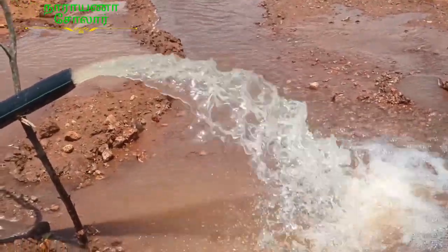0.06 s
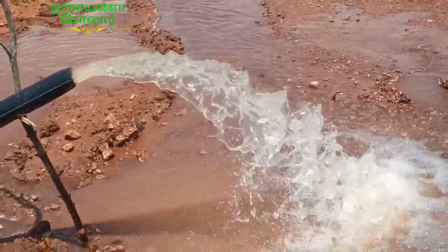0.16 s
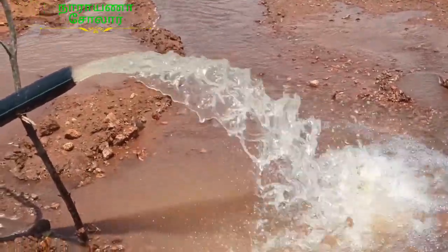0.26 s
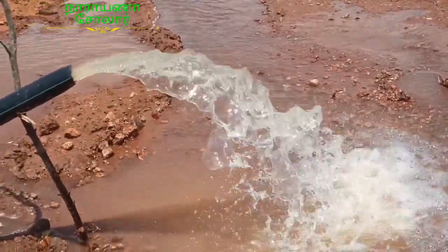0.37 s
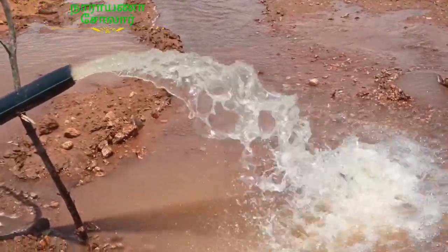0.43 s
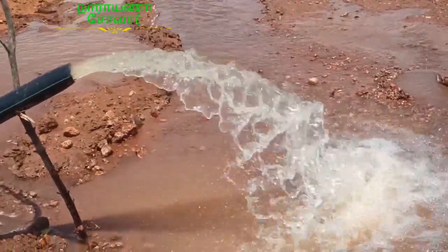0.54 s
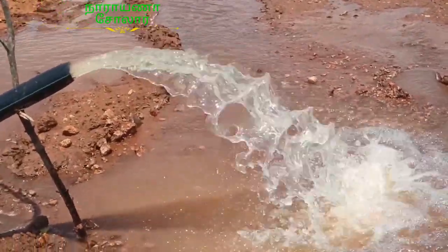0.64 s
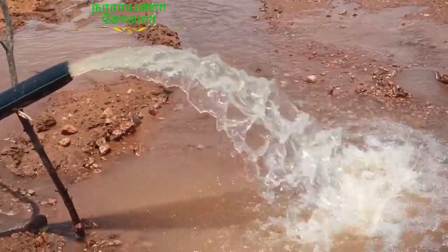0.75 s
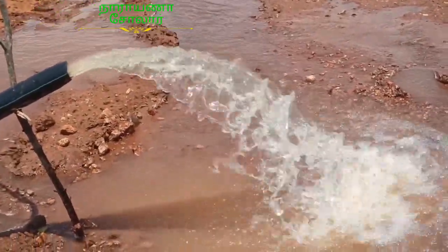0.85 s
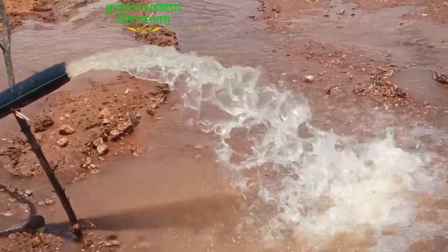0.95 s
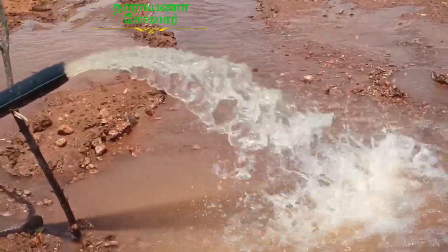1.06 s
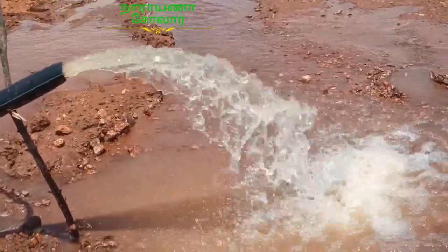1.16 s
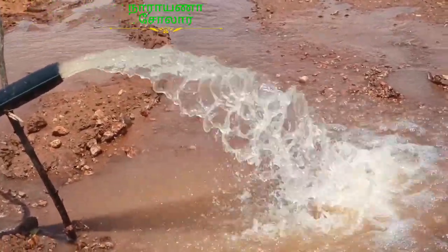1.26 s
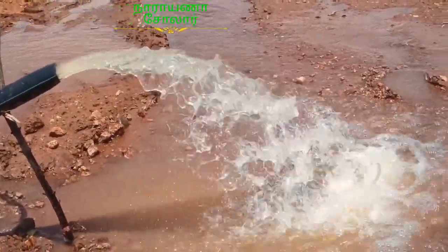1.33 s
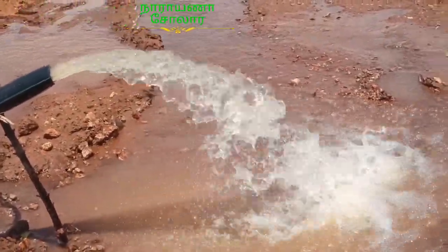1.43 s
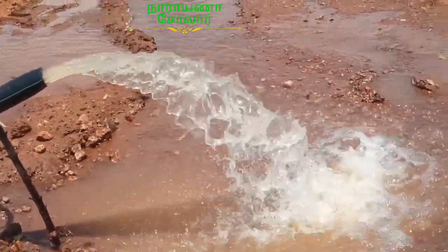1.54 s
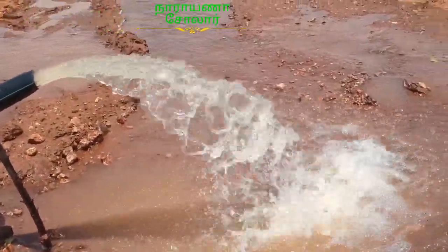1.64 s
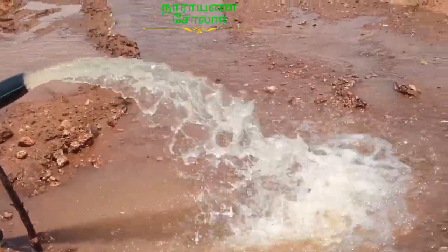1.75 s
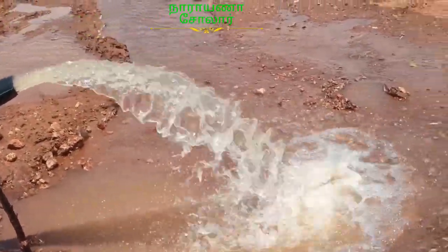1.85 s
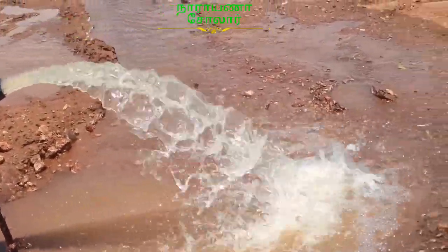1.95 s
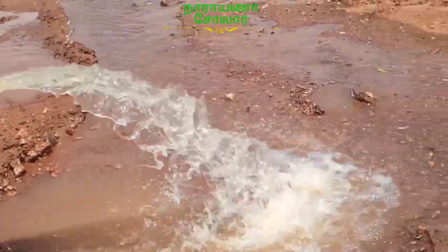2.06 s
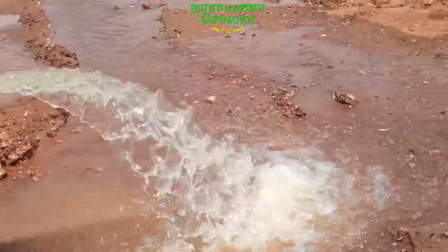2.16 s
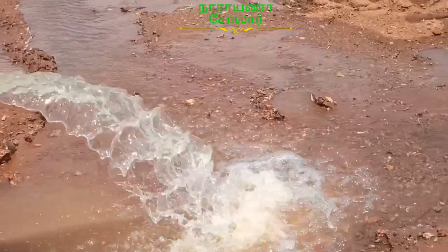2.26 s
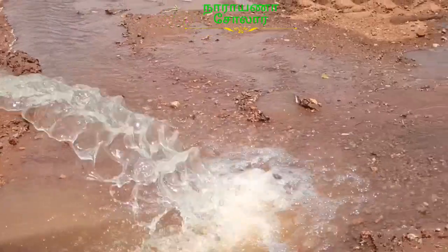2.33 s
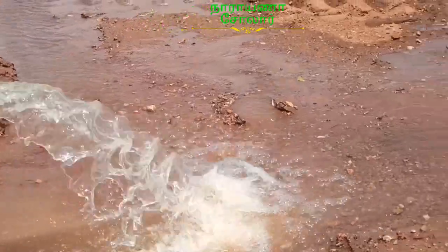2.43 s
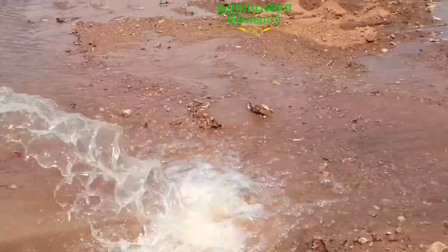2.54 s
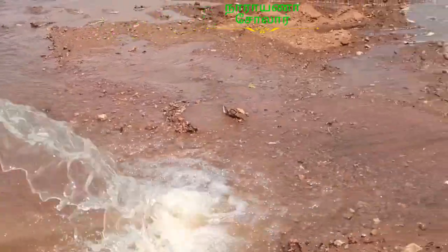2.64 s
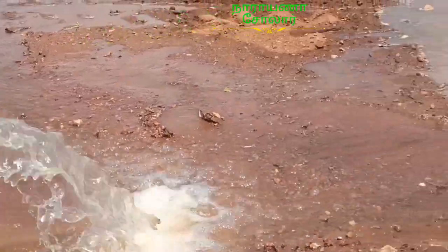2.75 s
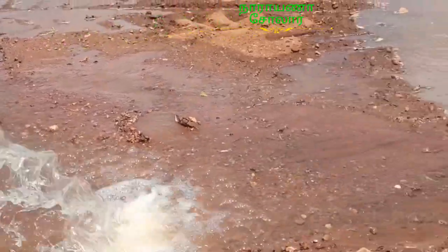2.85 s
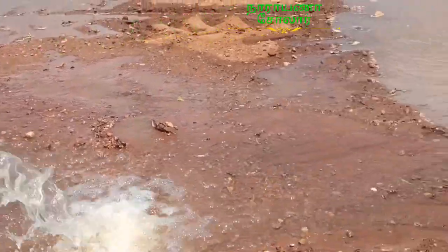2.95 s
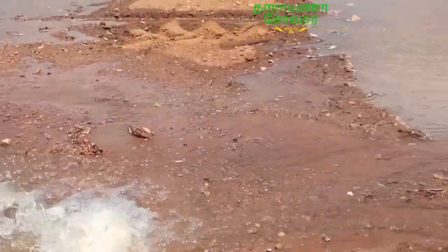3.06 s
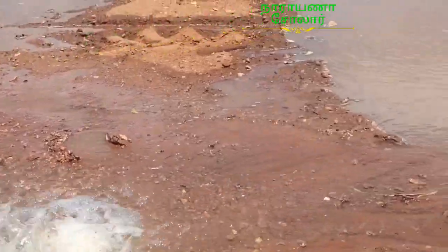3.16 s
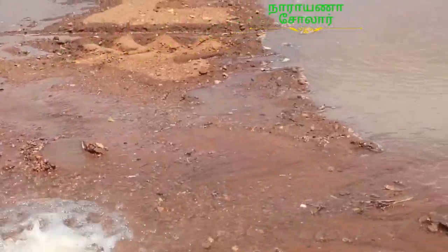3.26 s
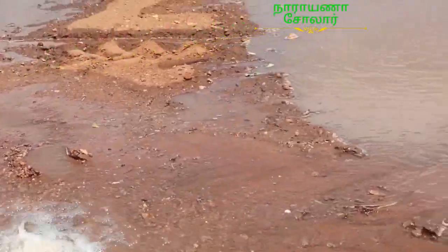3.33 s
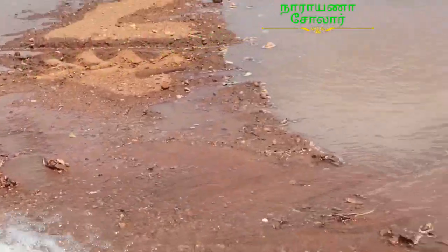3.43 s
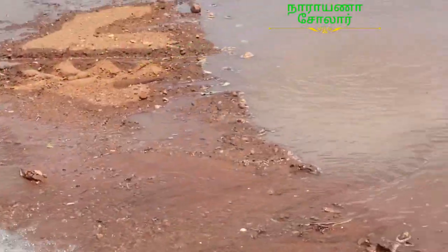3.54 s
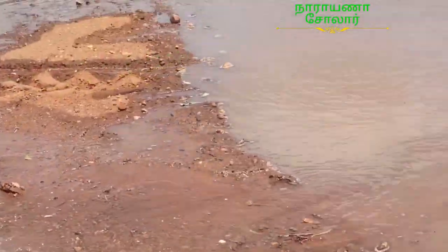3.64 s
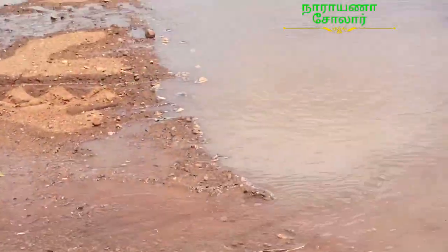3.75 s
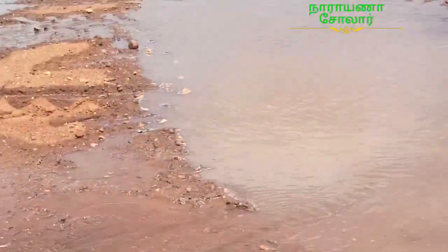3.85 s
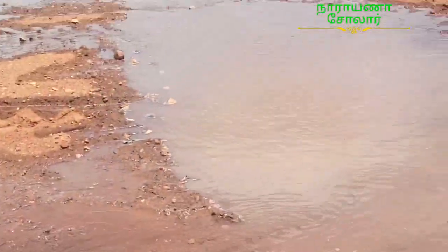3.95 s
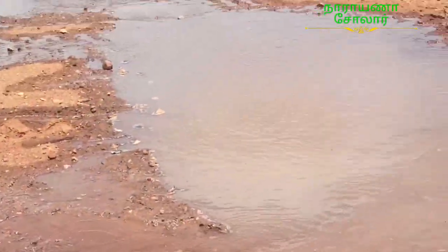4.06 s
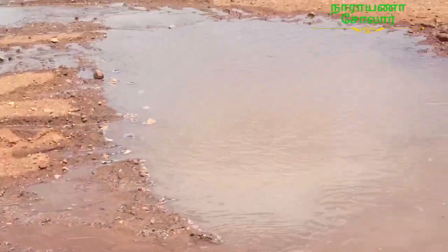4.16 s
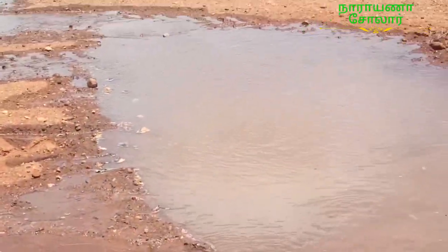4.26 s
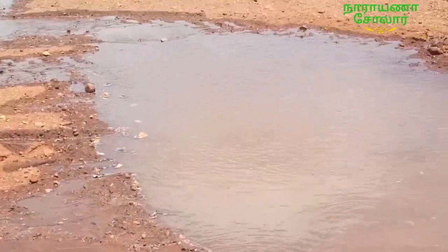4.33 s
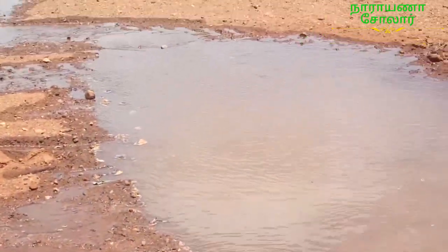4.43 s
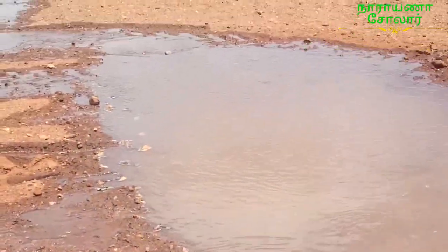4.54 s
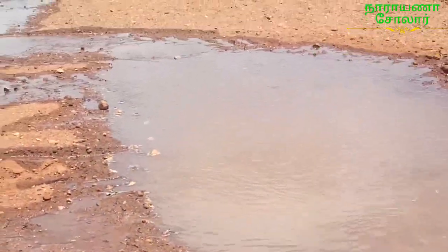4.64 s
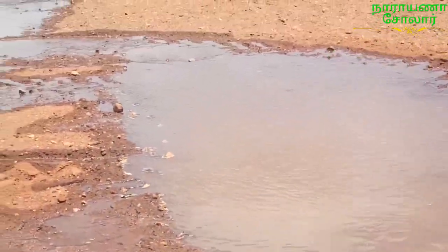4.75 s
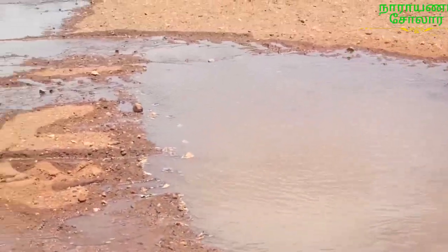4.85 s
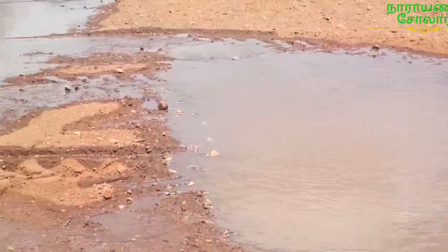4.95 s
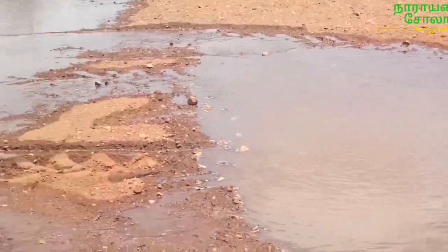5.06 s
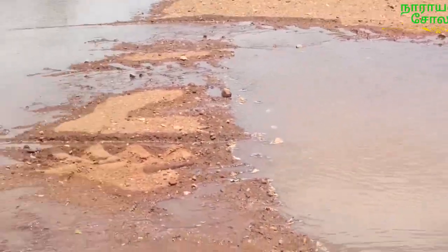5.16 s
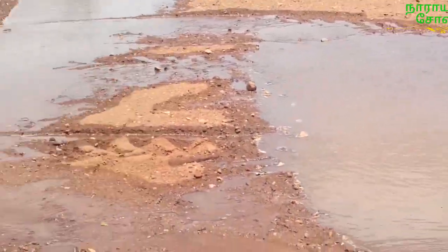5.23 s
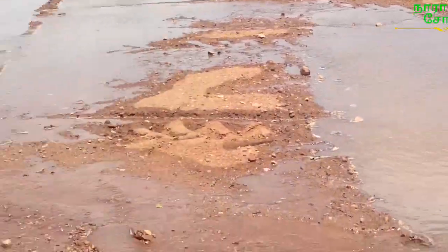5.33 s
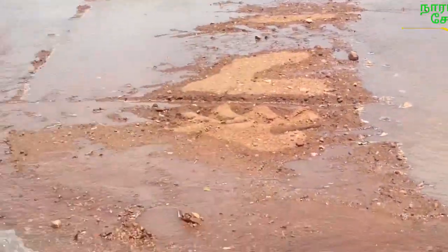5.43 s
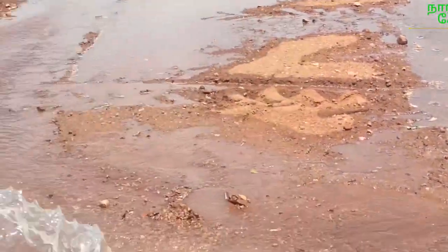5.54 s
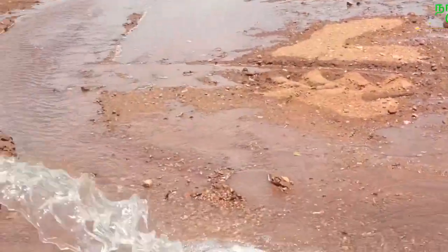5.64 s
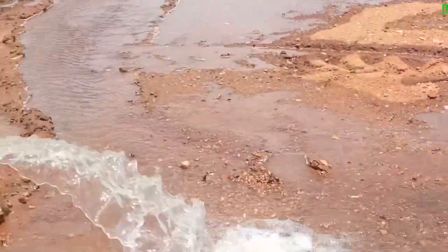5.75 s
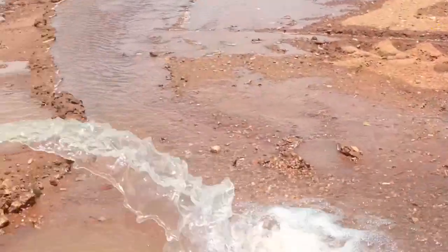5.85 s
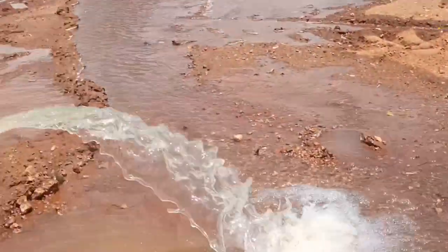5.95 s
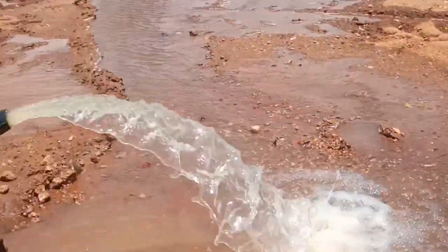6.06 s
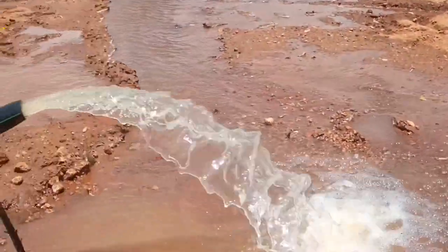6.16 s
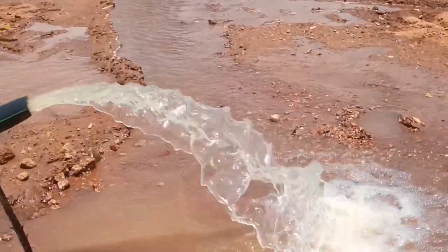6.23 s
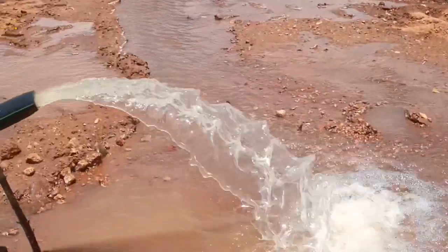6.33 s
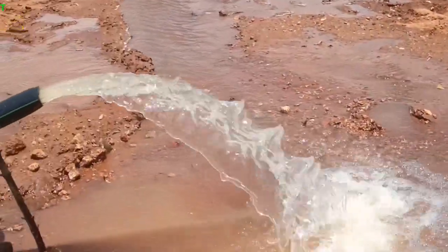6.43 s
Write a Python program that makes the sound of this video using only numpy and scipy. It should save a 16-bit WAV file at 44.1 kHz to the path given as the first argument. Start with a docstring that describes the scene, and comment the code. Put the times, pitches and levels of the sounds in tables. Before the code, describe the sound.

Strong wind buffeting nearly buries a steady, hissing gush of pipe water, which is left clearer with soft bubbling and a few late gusts.

```python
"""A thick jet from an irrigation pipe plunges into a muddy pool in an open field: noisy drops over ringing bubbles.
Lumps of water slap down in quick noise bursts, while hard wind, made of wavering noise bands, buffets the microphone.
From about two seconds the microphone swings away from the splash, which recolours its hiss and moves its echoes.
At three seconds the wind turns light, with a few gusts; soon short noise plops mark air pockets closing in the pool.
In the last second the microphone swings back to face the splash."""
import sys
import numpy as np
from scipy import signal
from scipy.fft import rfft, irfft
from scipy.io import wavfile
from scipy.ndimage import uniform_filter1d, map_coordinates

SR = 44100
rng = np.random.default_rng(int(sys.argv[2]) if len(sys.argv) > 2 else 0)


def generate_wav(signal):
    """Clip the signal to [-1, 1] and save it as 16-bit WAV at the path in sys.argv[1]."""
    frames = np.transpose(np.atleast_2d(signal))
    scaled = np.clip(frames, -1, 1) * 32767
    pcm = np.round(scaled).astype(np.int16)
    wavfile.write(sys.argv[1], SR, pcm)


N = 286334

# the splash's slowly changing loudness: (time [s], relative level [dB])
SPRAY_LEVEL = [(0, -32.5), (.8, -35), (1.65, -35), (2.1, -36.5), (2.95, -37.5), (3.4, -34.5), (4.0, -36.5),
               (4.4, -37), (5.2, -39.8), (5.6, -35.5), (6.49, -36)]
# the churning pool: (time [s], relative level [dB])
POOL_LEVEL = [(0, -39.5), (2.5, -41.5), (3.3, -40.5), (4.2, -37.5), (5.0, -36.5), (5.6, -38.5), (6.49, -39)]
# the biggest lumps of water landing: (time [s], relative peak [dB])
SLAP_HITS = [(0.139, -18), (0.357, -17), (0.536, -16), (1.359, -14.5), (1.679, -16.5), (1.823, -16.5),
             (2.31, -14.5), (2.496, -13.5), (3.139, -20), (3.819, -15.5), (3.947, -15), (4.584, -17.5),
             (5.33, -20), (5.945, -16), (6.171, -16.5)]
# air pockets closing in the pool: (time [s], relative peak [dB])
GULP_HITS = [(3.428, -33), (3.828, -33), (4.45, -32), (4.583, -33), (5.174, -26)]
# colour of the spray at each heading: (frequency [Hz], relative gain [dB])
FACING_COLOUR = [(1400, -17), (2100, -15.5), (2650, -11), (3050, -1), (3600, -1), (4250, -4), (5200, -4),
                 (6200, -9.5), (6700, -4), (7150, 1.5), (8300, -3), (9700, -14.5), (11400, -10),
                 (15400, -11.5)]
PAST_COLOUR = [(1400, -27), (2100, -8), (2550, -10.5), (3150, -5.5), (3900, 1.5), (4300, -1.5), (5000, -1),
               (6050, -5), (7100, -1), (8300, -6.5), (9200, -8.5), (10400, -11.5), (11400, -5.5),
               (13700, -13), (15400, -5)]
ASIDE_COLOUR = [(1400, -1), (2300, -11.5), (2700, -4), (3100, -2), (3850, 2.5), (4250, -5.5), (5350, 5),
                (6100, -11), (7250, 3), (8150, -12), (9300, -7), (10900, -13), (13800, -8.5), (15400, -9.5)]
AWAY_COLOUR = [(1400, -2.5), (2250, -9), (3000, -2.5), (3900, -2), (5200, -4), (6100, -2), (7250, 2),
               (8200, -7.5), (9300, -9), (10300, -14.5), (12500, -10), (13900, -9), (15400, -10.5)]
# colour of the bubbling: (frequency [Hz], relative gain [dB])
CHURN_COLOUR = [(250, 9), (480, -2.5), (670, 5), (860, 1.5), (1060, -8), (1300, -4), (1550, -11.5),
                (1850, -11), (2200, -39.5), (3000, -32)]
# the wind on the microphone, between gusts: (time [s], level [dB])
WIND_LEVEL = [(0, -15), (.25, -18), (.56, -13), (.92, -17.5), (1.75, -17), (2.0, -14.5), (2.64, -12),
              (2.92, -21.5), (2.98, -31.5), (3.5, -27.5), (4.0, -35.5), (4.65, -27.5), (5.1, -31),
              (5.7, -25.5), (6.3, -34), (6.49, -29)]
# colour of the wind at its usual strength: (frequency [Hz], relative gain [dB])
RUMBLE_COLOUR = [(28, -37), (40, -22), (65, -6.5), (100, 1.5), (170, 1.5), (260, -4), (400, -10.5),
                 (620, -20.5), (1000, -54.5), (1600, -58), (2500, -61)]
# the strongest vortices sweeping over the microphone port: (time [s], relative peak [dB], core width [ms])
VORTICES = [(0.454, -2.5, 0.58), (0.469, -4.5, 0.61), (0.642, -10, 0.6), (1.398, -6.5, 1.36),
            (1.546, -7.5, 0.61), (1.675, -3.5, 0.85), (1.828, -0.5, 1.9), (1.867, -3, 0.92),
            (2.224, -6.5, 1.07), (2.267, -5, .62), (2.346, -7.5, 0.85), (2.644, -6, 0.65),
            (2.724, -7, 0.93), (5.416, -12, 1.02), (5.49, -13.5, 1.4), (6.136, -10.5, 1.3),
            (6.1448, -3, 1.1), (6.1483, -3.5, 0.85)]
# the swinging microphone: (time [s], heading [0 facing the splash, 1 past it, 2 aside, 3 away,
# 4 facing again], delay of the echo off the hand [ms], delay of the echo off the chest [ms])
SWING_PATH = [(0, -0.5, 0.85, 2.46), (1.8, 0, 0.84, 2), (2.6, 1, 0.82, 2.06), (3.3, 2.5, 0.63, 1.96),
              (3.8, 2.5, 0.61, 2.23), (4.4, 2, 0.6, 2.2), (4.85, 3, 0.6, 2), (5.1, 2.5, 0.66, 2.08),
              (5.3, 3, 0.74, 2.2), (5.65, 3.5, 0.85, 2.36), (6.49, 4, 0.89, 2.8)]
# how bright or dull the wind noise is over time: (time [s], tilt [dB per octave])
WIND_TILT = [(0, -1.5), (.65, 1.5), (1.95, .2), (2.75, 2), (3.2, -2), (5.1, -2.7), (6.49, 1)]
# gusts that swell and sink back: (time of the crest [s], rise [dB], length at half height [s])
GUST_SWELLS = [(.35, 5.5, .07), (1.17, 6.5, 0.06), (1.4, 3, 0.036), (1.68, 7, 0.086), (3.2, 7.5, 0.093),
               (4.42, 4.5, .06), (4.89, 5.5, 0.034), (5.3, 4, 0.059), (5.82, 10, 0.11), (6.14, 14.5, 0.053)]
# lulls, in which the wind briefly drops: (time of the deepest point [s], drop [dB], length at half depth [s])
LULL_DIPS = [(1.32, 6.5, 0.042), (1.49, 8.5, 0.065), (2.05, 6, 0.029), (2.39, 3.5, 0.032), (3.03, 4.5, .1),
             (4.03, 7, .05)]

USUAL_WIND_DB = -14
WANDERS_PER_S = 10.4   # roughly how often the wind's strength wavers
SURGE_DB, SURGES_PER_S = 0.86, 18   # the jet lands a little unevenly
SLAP_DECAY_S = .013
CUTOFF_HZ = 15500


def from_db(db):
    """Turn decibels into gain."""
    return 10 ** (np.asarray(db) / 20)


def rms_one(x):
    """Scale to rms 1."""
    return x / np.sqrt(np.mean(x ** 2) + 1e-20)


def in_time(rows, axis=1):
    """Join one column of a curve by straight lines, at every sample."""
    columns = np.transpose(rows)
    return np.interp(np.arange(N) / SR, columns[0], columns[axis])


def at_hz(points, hz):
    """Join a spectrum by straight lines on a log-frequency axis, flat past its ends."""
    knots, db = np.transpose(points)
    return np.interp(np.log(np.maximum(hz, 1)), np.log(knots), db)


def coloured(x, spectrum):
    """Filter x by a spectrum, falling away steeply below its lowest point; rms 1."""
    hz = np.arange(N // 2 + 1) * SR / N
    skirt = 1 / np.sqrt(1 + (spectrum[0][0] / (hz + 1)) ** 8)
    return rms_one(irfft(rfft(x) * from_db(at_hz(spectrum, hz)) * skirt, N))


def band(x, low_hz, high_hz):
    """Pass a band of frequencies with gentle slopes."""
    sos = signal.butter(2, [low_hz, high_hz], "band", fs=SR, output="sos")
    return signal.sosfilt(sos, x + 1e-18)


def drift(rate):
    """Wander smoothly by chance, with about `rate` turns a second; spread 1."""
    # smoothed noise at a twentieth of the sample rate, its first stretch dropped as the filter settles
    pole = np.exp(-40 * np.pi * rate / SR)
    noise = rng.standard_normal(N // 20 + 2002)
    slow = signal.lfilter([1], [1, -2 * pole, pole * pole], noise)[2000:]
    return np.interp(np.arange(N) / 20, np.arange(len(slow)), rms_one(slow))


def swells(rows):
    """Raise a bell-shaped bump in dB for each row of (time, dB, length at half height)."""
    t = np.arange(N) / SR
    return sum(db * .5 ** ((2 * (t - s) / length) ** 2) for s, db, length in rows)


def ring(clicks, hz, t60):
    """Set a decaying sine ringing at each click, its height that of the click."""
    radius = from_db(-60 / (t60 * SR))
    angle = 2 * np.pi * hz / SR
    return signal.lfilter([0, np.sin(angle)], [1, -2 * radius * np.cos(angle), radius ** 2], clicks + 1e-18)


def fade(clicks, seconds):
    """Let each click jump up and die away exponentially."""
    return signal.lfilter([1], [1, -np.exp(-1 / (seconds * SR))], clicks + 1e-18)


def strikes(rows):
    """Place one click for each row of (time, dB)."""
    clicks = np.zeros(N)
    for s, db in rows:
        clicks[int(s * SR)] += from_db(db)
    return clicks


def rain_of(per_s, spread_db):
    """Scatter clicks at random moments, many small and a few large."""
    sizes = from_db(spread_db * np.minimum(rng.exponential(1, N), 4))
    return sizes * (rng.random(N) < per_s / SR)


def bubbles(clicks, low_hz, high_hz, cycles, count):
    """Ring one bubble of random size per click; every size dies by 60 dB over the same number of cycles."""
    dealt = rng.integers(0, count, N)
    signed = clicks * rng.choice([-1, 1], N)
    out = 0
    for k, hz in enumerate(np.geomspace(low_hz, high_hz, count)):
        # higher bubbles ring louder
        out = out + hz * ring(signed * (dealt == k), hz, cycles / hz)
    return rms_one(out)


def lumps(per_s, spread_db, decay_s, steady):
    """The jet breaks into lumps: each landing throws up a burst that dies quickly, over an even flow."""
    power = fade(rain_of(per_s, spread_db) ** 2, decay_s)
    # level out the slower changes, leaving single landings
    power = power / uniform_filter1d(power, size=SR // 10)
    return rms_one(np.sqrt(steady + power))


def spray(landing):
    """Drops tick with every landing and tiny bubbles ping in the foam."""
    ticks = rain_of(per_s=12000, spread_db=1.0) * rng.standard_normal(N)
    drops = rms_one(ticks + 0.65 * rng.standard_normal(N))
    fizz = bubbles(rain_of(per_s=1100, spread_db=4.0), low_hz=1891, high_hz=14970, cycles=87, count=60)
    flow = from_db(in_time(SPRAY_LEVEL) + SURGE_DB * drift(rate=SURGES_PER_S))
    # landings and slaps add as powers
    bursts = np.hypot(flow * landing, slaps())
    return drops * bursts + from_db(-7.5) * fizz * flow


def pool(landing):
    """Air dragged under by the jet rings as larger bubbles, over a bed of noise."""
    rings = bubbles(rain_of(per_s=900, spread_db=2.5), low_hz=354, high_hz=2350, cycles=16.0, count=30)
    churn = coloured(rings + from_db(6.0) * rng.standard_normal(N), CHURN_COLOUR)
    # the pool follows the landings more mildly than the spray
    return churn * from_db(in_time(POOL_LEVEL)) * landing ** 0.57


def wind(lumpy_db, brighten, wander_db):
    """Turbulence at the port: the harder it blows, the smaller its eddies and the higher it reaches."""
    strength_db = in_time(WIND_LEVEL) + swells(GUST_SWELLS) - swells(LULL_DIPS)
    strength_db = strength_db + wander_db * drift(rate=WANDERS_PER_S)
    # soft limits on the swirl
    swirl_db = lumpy_db * np.tanh(drift(rate=58) / 2) * 2
    tilt_db = in_time(WIND_TILT) + brighten * (strength_db + swirl_db - USUAL_WIND_DB)

    edges = np.geomspace(28, 2560, 14)  # Hz
    # neighbouring bands draw on different noises
    white = rng.standard_normal((2, N))
    eddies = 0
    for k, (low, high) in enumerate(zip(edges, edges[1:])):
        hz = np.sqrt(low * high)
        octaves = np.clip(np.log2(hz / 150), -1.5, 2)
        gain_db = at_hz(RUMBLE_COLOUR, hz) + swirl_db + tilt_db * octaves
        eddies = eddies + band(white[k % 2], low, high) * from_db(gain_db)
    # the gust sets the strength, the eddies only stir it
    eddies = eddies / np.sqrt(uniform_filter1d(eddies ** 2, size=SR // 10) + 1e-12)
    return from_db(strength_db) * eddies


def swing(x):
    """The treble is shaded by the heading and combed by echoes off whoever holds the microphone."""
    colours = (FACING_COLOUR, PAST_COLOUR, ASIDE_COLOUR, AWAY_COLOUR, FACING_COLOUR)
    heading = in_time(SWING_PATH)
    direct = 0
    for k, colour in enumerate(colours):
        # crossfade between neighbouring headings
        share = np.interp(heading, np.arange(len(colours)), np.eye(len(colours))[k])
        direct = direct + share * coloured(x, colour)
    direct = np.std(x) * direct
    hand = echo(direct, in_time(SWING_PATH, axis=2))
    chest = echo(direct, in_time(SWING_PATH, axis=3))
    return direct + from_db(-12) * hand + from_db(-14) * chest


def echo(x, ms):
    """Sound bounced off a moving surface arrives late by a changing delay."""
    return map_coordinates(x, [np.arange(N) - ms * SR / 1000], order=3)


def slaps():
    """The biggest lumps jump up and die away: a loudness curve for the drops they throw up."""
    return from_db(-12.5) * fade(strikes(SLAP_HITS), seconds=SLAP_DECAY_S)


def buffets(level_db):
    """A passing vortex pushes, flips sharply and pulls; the narrower its core, the crisper the thump."""
    out, t = np.zeros(N), np.arange(N) / SR
    for s, db, core_ms in VORTICES:
        near = abs(t - s) < .03
        offset = (t[near] - s) * 1000 / core_ms  # in core widths
        swing_over = offset / (1 + offset ** 2) ** 1.58
        out[near] += from_db(db + level_db) * swing_over / swing_over.max()
    return band(out, low_hz=82, high_hz=1500)


def gulps():
    """An air pocket closes with a short hollow plop, a band-passed burst of noise."""
    burst = rng.standard_normal(N) * fade(strikes(GULP_HITS), seconds=.005)
    hollow = signal.butter(4, [550, 1500], "band", fs=SR, output="sos")
    return from_db(15) * signal.sosfilt(hollow, burst)


def scene():
    """Spray, pool and wind reach one microphone."""
    landing = lumps(per_s=110, spread_db=1.5, decay_s=0.008, steady=0.55)
    water = swing(spray(landing)) + pool(landing) + gulps()
    air = wind(lumpy_db=3.0, brighten=0.25, wander_db=0.84) + buffets(level_db=1.5)
    return (water + air)[None]


def record(dry):
    """The deepest rumble is filtered out, the strongest gusts are rounded off, the top is cut."""
    lean = signal.sosfilt(signal.butter(3, 36, "high", fs=SR, output="sos"), dry)
    # peaks bend smoothly towards a ceiling of .9
    rounded = lean / (1 + (lean / .9) ** 8) ** (1 / 8)
    return signal.sosfilt(signal.ellip(12, .1, 80, CUTOFF_HZ, fs=SR, output="sos"), rounded)


dry = scene()
out = record(dry)
generate_wav(out)
```